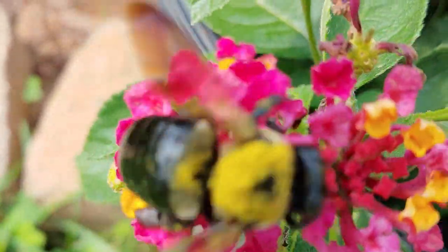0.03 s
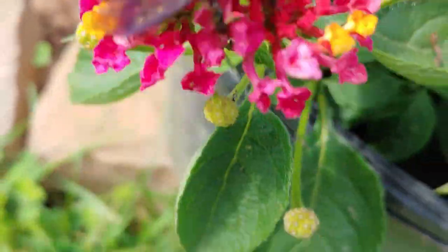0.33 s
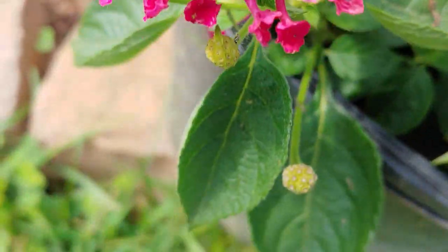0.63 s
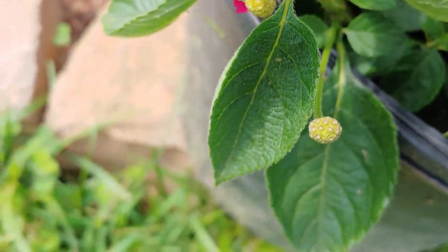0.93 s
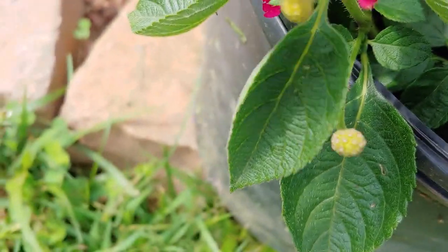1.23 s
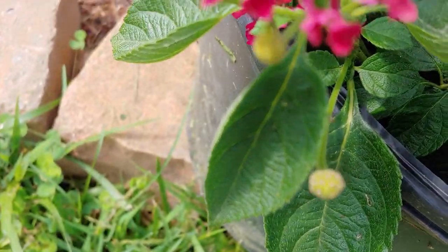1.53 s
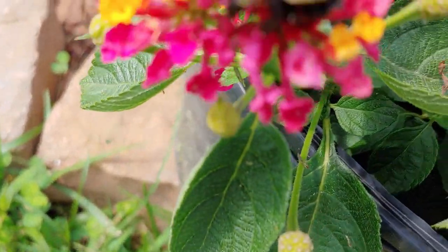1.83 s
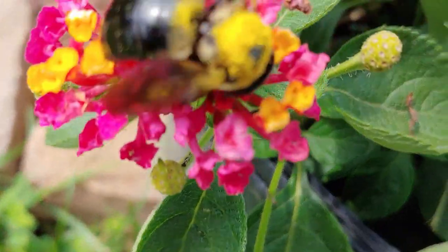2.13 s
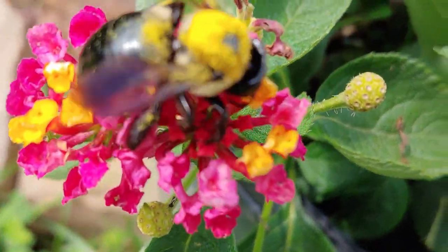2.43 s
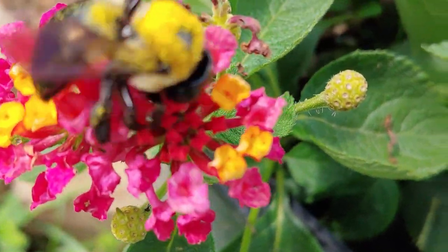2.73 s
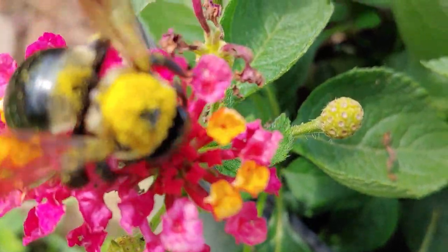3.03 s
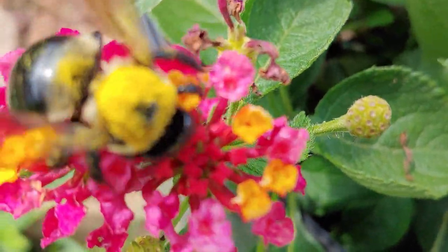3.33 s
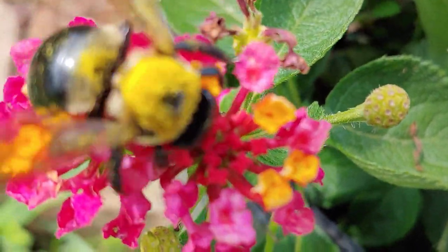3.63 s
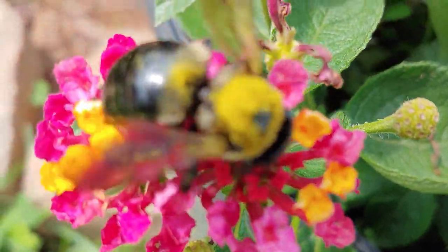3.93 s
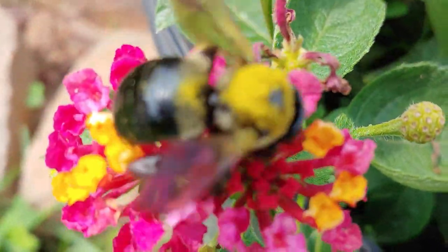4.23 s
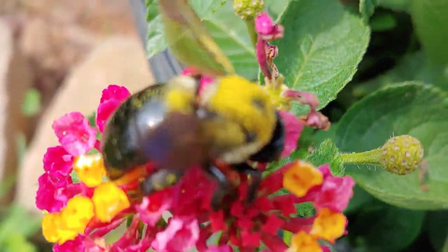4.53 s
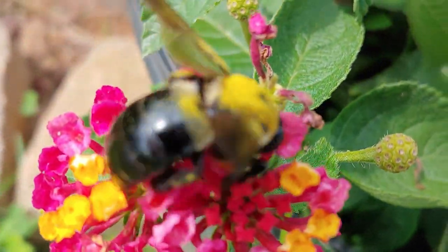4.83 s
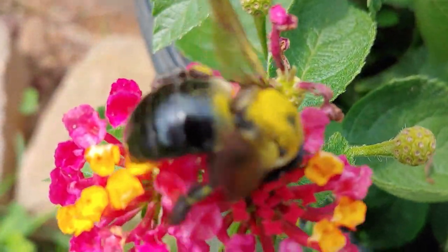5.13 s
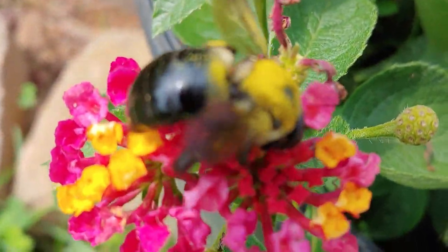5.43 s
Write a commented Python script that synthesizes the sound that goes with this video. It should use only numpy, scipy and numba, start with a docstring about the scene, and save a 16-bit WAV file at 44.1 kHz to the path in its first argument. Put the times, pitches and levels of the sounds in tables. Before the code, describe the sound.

A low outdoor rumble and a faint, distant motor hum run throughout this garden scene, heard from a handheld phone. Small birds give a few short, high chips at the very start and again just before 1 second. An insect, most likely a cicada, begins almost inaudibly and emerges at around 1.5 seconds as a high, ticking buzz in rapid throbs. The throbs quicken and swell until about 3 seconds, when the rumble also rises a little. By 4 seconds the ticks have softened into a pulsing sizzle that holds to the end. From about 2.5 seconds the birds grow busier, with quick warbles and trilled notes from different sides, loudest and densest between 5 seconds and the end at about 5.7. A few brief, very soft rubs of leaves or a hand come now and then, near 0.3, 2.5 and 4 seconds.

```python
"""A summer garden, from a phone held at a flower bed. A low outdoor rumble and a distant motor's hum lie
under everything, and small birds chip among the trees from the start. An insect, most likely a cicada,
begins faintly: tymbal clicks ring its body in throbs that quicken and swell for three seconds. The birds
grow busier and warble, and by four seconds the ticks have softened to a sizzle.
Now and then the leaves or the hand stir softly."""
import sys
import numpy as np
from scipy import signal
from scipy.fft import rfft, irfft
from scipy.io import wavfile
from scipy.ndimage import uniform_filter1d
from numba import njit

SR = 44100
rng = np.random.default_rng(int(sys.argv[2]) if len(sys.argv) > 2 else 0)


def digitize_waveform(pressure):
    """Quantize a signal to 16-bit integers and store it at the path in sys.argv[1].

    Rows of a 2-D input are taken as channels; values are limited to [-1, 1].
    """
    field = np.atleast_2d(pressure).T
    bounded = np.clip(field, -1, 1)
    quanta = np.round(bounded * 32767).astype(np.int16)
    wavfile.write(sys.argv[1], SR, quanta)


N = 251370
TIME = np.arange(N) / SR
BIN_HZ = np.maximum(np.fft.rfftfreq(N, 1 / SR), 1)

# the rumble rising with the breeze: time_s, level_db
BREEZE = [(0, -56), (.5, -58.5), (1.8, -58.5), (3.05, -53), (3.7, -55), (5.7, -54.3)]


def undb(db):
    """Decibels to gain."""
    return 10 ** (np.asarray(db) / 20)


def unit(x):
    """Scale to rms 1."""
    return x / np.sqrt(np.mean(x ** 2))


def read(table, at):
    """The columns of a table, interpolated along the first."""
    key, *columns = np.transpose(table)
    return [np.interp(at, key, column) for column in columns]


def sides(pan_db):
    """Microphone gains of constant total power; pan_db is left minus right."""
    return undb(np.array([[1], [-1]]) * pan_db / 2) / np.sqrt((undb(pan_db) + undb(-pan_db)) / 2)


def colour(x, table, lift_db=0):
    """Filter by a left and a right spectrum."""
    hz, *channels = np.transpose(table)
    db = np.array([np.interp(np.log(BIN_HZ), np.log(hz), channel) for channel in channels])
    return irfft(rfft(x) * undb(db + lift_db), N)


def wander(rate_hz):
    """A smooth random curve with a spread near 1."""
    hold = int(SR / rate_hz)
    steps = np.repeat(rng.standard_normal(N // hold + 1), hold)
    return 1.3 * uniform_filter1d(uniform_filter1d(steps, hold), hold)[:N]


@njit
def resonate(x, hz, width_hz):
    """Band-pass whose centre can move every sample."""
    y, band_state, low_state = np.empty(len(x)), 0., 0.
    for i in range(len(x)):
        tuning, damping = np.tan(np.pi * hz[i] / SR), width_hz / hz[i]
        band = (band_state + tuning * (x[i] - low_state + 1e-18)) / (1 + tuning * (tuning + damping))
        band_state = 2 * band - band_state
        low_state += 2 * tuning * band
        y[i] = damping * band
    return y


def ring(x, hz, width_hz):
    """A resonance at one steady pitch."""
    return resonate(x, np.full(N, float(hz)), float(width_hz))


def microphones(pair, lag_samples=18):
    """Sound reaches the right microphone a little before the left."""
    return np.array([np.roll(pair[0], lag_samples), pair[1]])


def echoes(x, t60_s):
    """Dense reflections from leaves and walls, different at each microphone."""
    tail = rng.standard_normal((2, SR)) * undb(-60 * TIME[:SR] / t60_s)
    tail /= np.sqrt(np.sum(tail ** 2, axis=1, keepdims=True))
    return signal.fftconvolve(np.atleast_2d(x), tail, axes=1)[:, :N]


def garden_air(shared_below_hz=750, flicker_db=1.32):
    """Distant rumble, alike at both microphones, under a faint wide hiss."""
    # relative spectrum of the open air: frequency_hz, left_db, right_db
    air_spectrum = [(22.3, -18, -16.5), (51.4, 0, -2.5), (78.5, -0.5, -3.5), (105, -6, -6.5),
                    (144.4, -6, -8), (190, -15, -15.5), (326, -14, -16.5), (473, -24.5, -25.5),
                    (607, -23.5, -25.5), (920, -31.5, -35), (1270, -29, -34.5), (1930, -36, -28.5),
                    (2970, -32.5, -34.5), (5940, -37.5, -40.5), (8200, -58.5, -53.5), (11100, -51.5, -54.5),
                    (15500, -63.5, -59)]
    common, apart = rng.standard_normal(N), rng.standard_normal((2, N))
    # below 36 Hz it is breeze on each microphone by itself
    likeness = .96 / (1 + (BIN_HZ / shared_below_hz) ** 2) / (1 + (36 / BIN_HZ) ** 4)
    pair = irfft(rfft(common) * np.sqrt(likeness) + rfft(apart) * np.sqrt(1 - likeness), N)
    noise = unit(colour(microphones(pair), air_spectrum))
    rumble = irfft(rfft(noise) / (1 + (BIN_HZ / 900) ** 4), N)
    hiss = noise - rumble
    rumble_db, = read(BREEZE, TIME)
    return rumble * undb(rumble_db + flicker_db * wander(12)) + hiss * undb(-54.5)


def distant_motor(waver=.014, fade_db=4, breeze_share=.51):
    """Low motor tones that wander, and swell with the rumble as the breeze carries them."""
    # the hum at full breeze: pitch_hz, level_db
    motor_tones = [(80, -62), (120, -71), (241, -75)]
    drift = 1 + waver * wander(4)
    hum = np.zeros(N)
    for hz, db in motor_tones:
        tone = unit(np.sin(2 * np.pi * np.cumsum(hz * drift) / SR))
        hum += undb(db + fade_db * wander(8)) * tone
    rumble_db, = read(BREEZE, TIME)
    carried = undb(breeze_share * (rumble_db - rumble_db.max()))
    return microphones(hum * carried * sides(2.5))


def stirs():
    """Leaves and the hand on the phone rub in brief, soft swells of noise."""
    # each rub: peak_s, length_s, centre_hz, level_db
    rubs = [(0.301, .05, 363, -63), (0.393, 0.097, 347, -63.5), (1.47, 0.054, 380, -65),
            (2.36, 0.36, 476, -66.5), (2.547, 0.033, 2840, -57.5), (3.964, 0.067, 380, -63.5),
            (5.615, 0.045, 360, -61)]
    out = np.zeros((2, N))
    for peak_s, length_s, hz, db in rubs:
        rub = ring(rng.standard_normal(N), hz, .39 * hz)
        rub = unit(ring(rub, hz, 1.4 * hz))
        out += rub * undb(db) * np.exp(-(2 * (TIME - peak_s) / length_s) ** 2)
    return microphones(out)


def birds(trill_hz=170, waver=.011, flutter_db=1.0, rough_depth_hz=140., overtone_db=-30):
    """Arched, gliding whistles from the trees, some trilled; the farther the bird, the more echo."""
    # each bird's perch and bend of a note, by name: pan_db, echo_db, arch_share
    perches = {"warbler": (3, -8, .04), "fluter": (-5, -3, -.06), "caller": (11, -3, .01),
               "left": (17, -8, .005), "right": (-23, -7, .02), "far": (8, -2, -.008)}
    # the calls: bird, start_s, length_s, first_hz, last_hz, trill_depth_hz, relative_level_db
    notes = [("warbler", .013, .047, 2250, 2360, 5, -68), ("warbler", .053, .045, 2430, 2660, 30, -58.5),
             ("left", .055, .042, 4950, 5340, 60, -65), ("left", .078, .025, 4090, 3700, 100, -47.5),
             ("warbler", .136, .031, 2350, 2480, 150, -59), ("far", .655, .16, 5620, 5450, 33, -66),
             ("far", .66, .17, 3370, 3270, 5, -67), ("right", .777, .056, 6600, 7350, 157, -52),
             ("far", 1.28, .094, 3370, 3310, 2, -68), ("far", 1.46, .045, 3200, 3140, 2, -68),
             ("fluter", 2.54, .038, 2100, 2450, 200, -57.5),
             ("warbler", 2.741, .058, 3050, 2790, 50, -49.5),
             ("warbler", 2.81, .049, 2840, 2250, 100, -49.5), ("warbler", 2.895, .045, 2120, 2650, 96, -54),
             ("warbler", 2.928, .034, 2720, 3060, 270, -46), ("caller", 3.3, .093, 5420, 5470, 22, -51.5),
             ("right", 3.393, .04, 6450, 7520, 160, -47.5),
             ("warbler", 3.695, .028, 2050, 2880, 128, -51.5),
             ("warbler", 3.711, .058, 2900, 3100, 230, -43),
             ("warbler", 3.782, .096, 2480, 2290, 100, -49.5),
             ("warbler", 3.96, .071, 2440, 2440, 203, -51.3), ("warbler", 4.052, .06, 2100, 2300, 36, -60),
             ("warbler", 4.116, .027, 2320, 2480, 200, -50.5),
             ("warbler", 4.303, .048, 2330, 2640, 350, -49.5), ("far", 4.678, .15, 3000, 2380, 41, -65),
             ("fluter", 4.848, .043, 2220, 1960, 148, -51),
             ("warbler", 4.886, .033, 2130, 2500, 388, -45.5),
             ("fluter", 4.907, .088, 2290, 1990, 28, -48.5), ("caller", 5.092, .076, 3560, 3210, 38, -52),
             ("left", 5.137, .016, 5170, 5350, 68, -45), ("warbler", 5.146, .034, 5400, 6350, 526, -41.5),
             ("caller", 5.203, .06, 3720, 3510, 135, -38), ("caller", 5.252, .042, 3640, 3080, 190, -42),
             ("caller", 5.35, .05, 3060, 2650, 50, -50), ("warbler", 5.376, .03, 2900, 2130, 234, -43.5),
             ("caller", 5.441, .024, 4480, 3630, 203, -46.5), ("left", 5.506, .046, 4890, 4780, 70, -47),
             ("left", 5.521, .027, 3750, 4380, 194, -46.5), ("left", 5.585, .026, 5350, 5030, 50, -44),
             ("left", 5.603, .019, 3520, 3880, 120, -44.5)]
    direct, far = np.zeros((2, N)), np.zeros((2, N))
    trill = np.sin(2 * np.pi * np.cumsum(trill_hz * (1 + .3 * wander(120))) / SR)
    drift, flutter = wander(260), wander(130)
    for bird, start_s, length_s, first_hz, last_hz, depth_hz, db in notes:
        pan_db, echo_db, arch = perches[bird]
        span = np.flatnonzero((TIME >= start_s) & (TIME < start_s + length_s))
        bend = 1 + arch * np.sin(np.linspace(0, np.pi, len(span)))
        glide_hz = np.linspace(first_hz, last_hz, len(span)) * bend
        # trilled notes are unsteady in pitch and level, plain whistles stay nearly pure
        rough = np.clip(depth_hz / rough_depth_hz, .15, 1.3)
        pitch_hz = glide_hz * (1 + rough * waver * drift[span]) + depth_hz * trill[span]
        phase = 2 * np.pi * np.cumsum(pitch_hz) / SR
        swell = signal.windows.tukey(len(span), .4) * undb(rough * flutter_db * flutter[span])
        # only the low notes carry an overtone
        tone = np.sin(phase) + undb(overtone_db) * (glide_hz.mean() < 3000) * np.sin(2 * phase)
        note = undb(db) * unit(swell * tone) * sides(pan_db)
        direct[:, span] += note
        far[:, span] += undb(echo_db) * note
    near_echoes = undb(-5) * echoes(direct, t60_s=.14)
    return undb(-3) * (microphones(direct) + near_echoes + echoes(far, t60_s=.56))


def cicada(click_hz=420, jitter=.1, uneven_db=1.0, crackle_db=3, crackle_decay_cycles=.54, snap=.061):
    """Ribs of the tymbals buckle in fast clicks and ring the abdomen, whose pitch dips in every throb."""
    # the song swells, then its ticks soften: time_s, level_db, throb_accent_db, pan_db
    song = [(0, -79.5, 2.5, 1), (.9, -74.5, 4.5, 1), (1.5, -65.5, 5, -5.5), (2, -56.5, 5.5, -3),
            (2.5, -50.5, 5, -1), (3.1, -46.5, 4, -.5), (4, -47, -2, .5), (5, -49, -1.5, 1.5),
            (5.7, -48.5, -1, 0)]
    # the throbs quicken as the insect warms to its song: time_s, rate_hz
    throb_rate = [(0, 8.175), (1, 8.938), (3.2, 12.283), (4.2, 13.143), (5.7, 13.712)]
    # the abdomen stretches fast, relaxes slowly and slackens: throb_share, resonance_hz, gain_db
    throb_shape = [(0, 6930, .5), (.14, 5200, 2), (.34, 3560, -1), (.76, 4700, 0), (.9, 5460, -4),
                   (1, 6740, -4.5)]
    # narrow high ringing tones in the buzz, strongest during the early ticks: pitch_hz, width_hz
    buzz_rings = [(4560, 174), (6720, 98), (7060, 120)]
    # tone of the buzz at the microphones: frequency_hz, left_db, right_db
    buzz_spectrum = [(960, -35, -20), (1300, -11.5, -9.5), (2270, -19.5, -14.5), (3070, -6.5, -12),
                     (3520, -7, -7), (3770, -6.5, -18.5), (4420, -7, -11), (5140, -10.5, -15.5),
                     (5700, -5, -12), (5790, -8, -7), (6600, -25, -6.5), (7000, -33, -7.5),
                     (8080, -41, -14.5), (8900, -48, -45), (11000, -35, -32), (15000, -39, -37)]
    # narrow peaks of the buzz: centre_hz, width_hz, lift_db
    buzz_peaks = [(2990, 100, 3), (3560, 100, 7), (4020, 62, 11), (4380, 50, 9), (4513, 76, 9),
                  (5290, 60, 10.5), (6640, 110, 4.5), (7006, 80, 10.5)]
    level_db, accent_db, pan_db = read(song, TIME)
    rate_hz, = read(throb_rate, TIME)
    throb_share = (np.cumsum(rate_hz) / SR) % 1
    # an accented throb snaps through its first part sooner
    throb_share = throb_share ** (1.07 * np.exp(-snap * accent_db))
    abdomen_hz, throb_db = read(throb_shape, throb_share)
    onset_db = accent_db * np.exp(-(throb_share / .17) ** 4)

    cycles = np.cumsum(click_hz * (1 + jitter * wander(250))) / SR
    clicks = np.diff(np.floor(cycles), prepend=0) * undb(uneven_db * wander(400))
    # each buckling trails off in a short crackle of the smaller ribs
    crackle = rng.standard_normal(N) * np.exp(-(cycles % 1) / crackle_decay_cycles)
    drive = (unit(clicks) + undb(crackle_db) * unit(crackle)) * undb(throb_db + onset_db)

    abdomen = resonate(drive, abdomen_hz, width_hz=1480.)
    # the tymbal plate keeps its own high ring while the abdomen sweeps
    plate = ring(drive, hz=6560, width_hz=2300)
    rings = sum(ring(drive, hz, width_hz) for hz, width_hz in buzz_rings)
    buzz = abdomen + undb(-5) * plate + undb(-17) * drive + undb(accent_db - 9) * rings

    heard = microphones(np.array([buzz, buzz])) + undb(-5) * echoes(buzz, t60_s=.024)
    # as the ticks soften into a sizzle, echoes fill more of the gaps
    heard += undb(-8 - accent_db) * echoes(buzz, t60_s=.62)
    peaks_db = sum(db / (1 + (2 * (BIN_HZ - hz) / width_hz) ** 2) for hz, width_hz, db in buzz_peaks)
    return unit(colour(heard, buzz_spectrum, peaks_db)) * undb(level_db) * sides(pan_db)


def scene():
    """The garden as it reaches the two microphones at the flower bed."""
    return cicada() + birds() + garden_air() + distant_motor() + stirs()


def record(dry, fade_s=.003, top_hz=15600):
    """The sound eases in and out; the phone cuts the highest treble."""
    edge_s = np.minimum(TIME, TIME[::-1])
    fade = np.sin(np.pi / 2 * np.clip(edge_s / fade_s, 0, 1)) ** 2
    return signal.sosfilt(signal.ellip(8, .2, 70, top_hz, fs=SR, output="sos"), dry * fade)


dry = scene()
out = record(dry)
digitize_waveform(out)
```